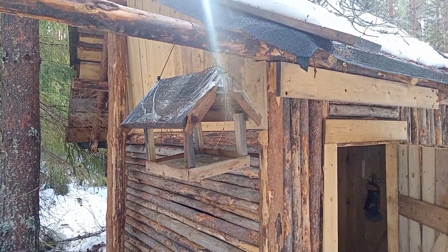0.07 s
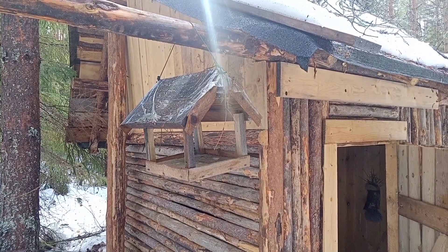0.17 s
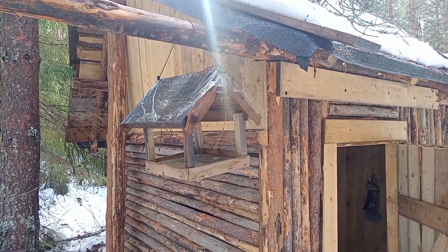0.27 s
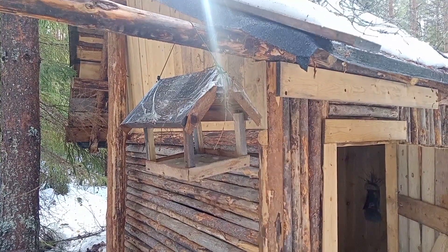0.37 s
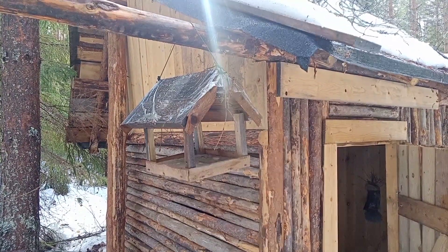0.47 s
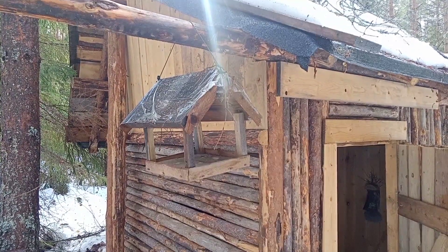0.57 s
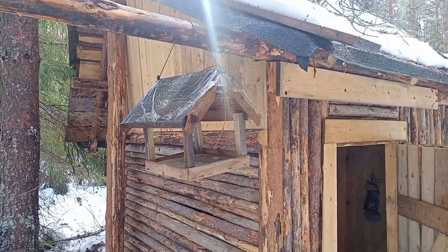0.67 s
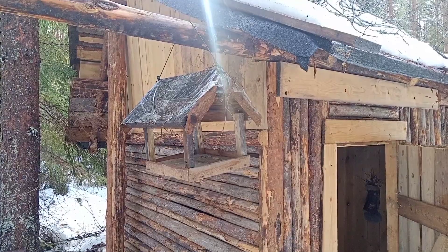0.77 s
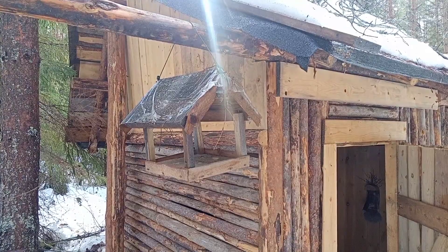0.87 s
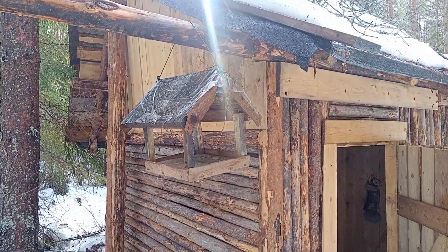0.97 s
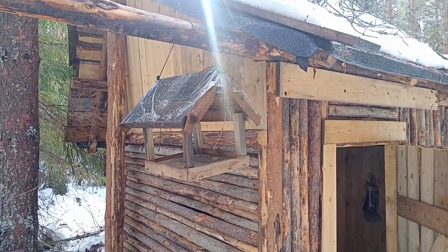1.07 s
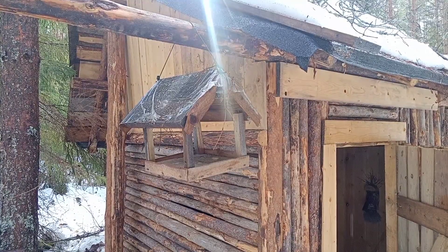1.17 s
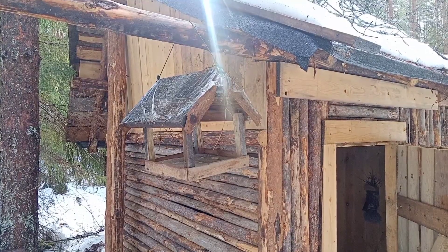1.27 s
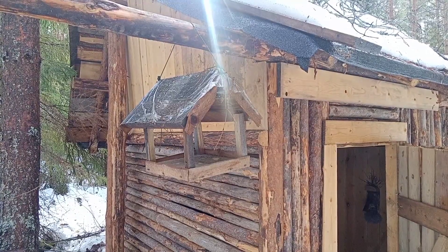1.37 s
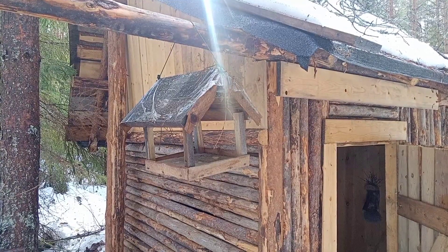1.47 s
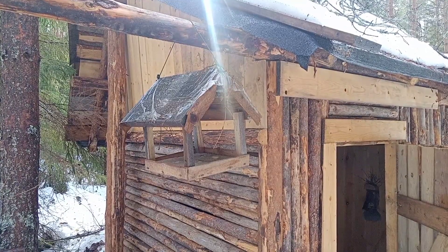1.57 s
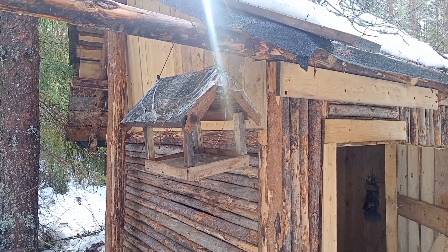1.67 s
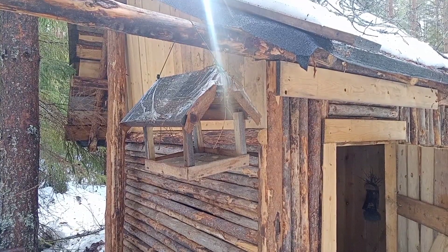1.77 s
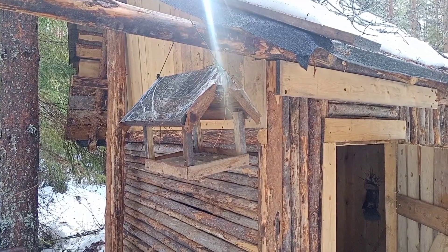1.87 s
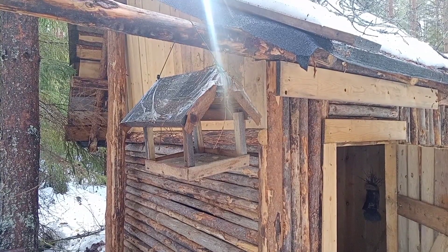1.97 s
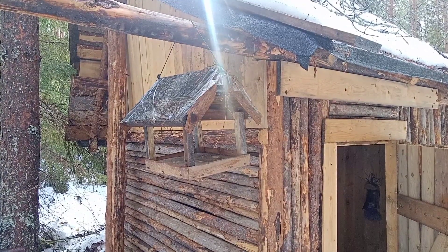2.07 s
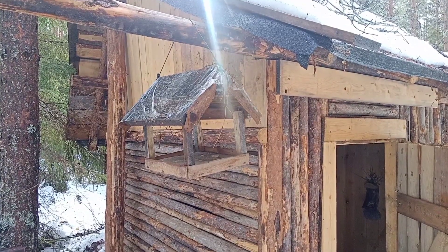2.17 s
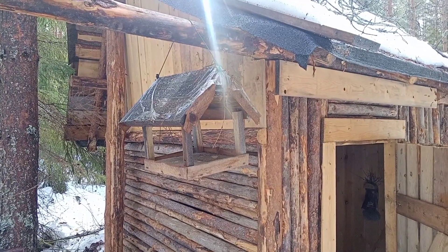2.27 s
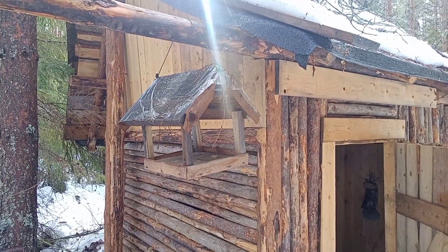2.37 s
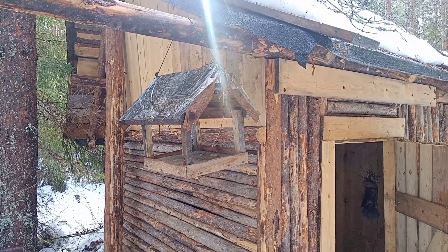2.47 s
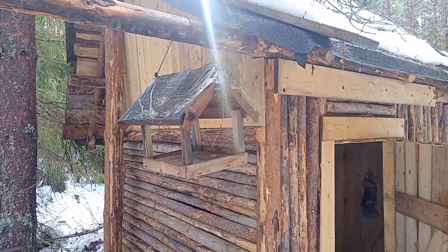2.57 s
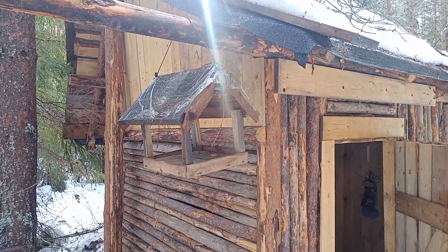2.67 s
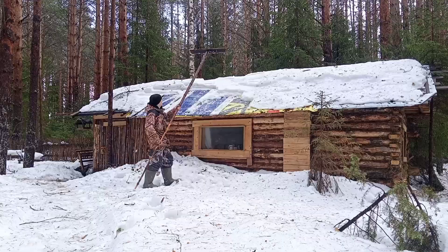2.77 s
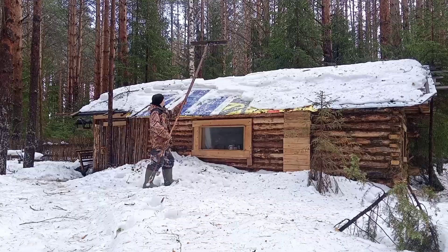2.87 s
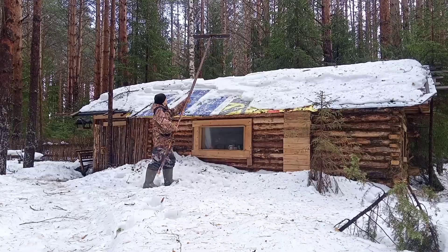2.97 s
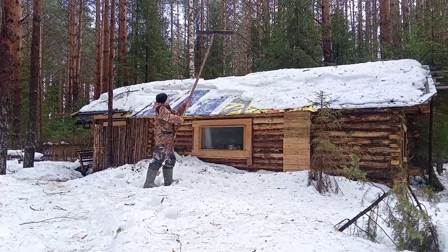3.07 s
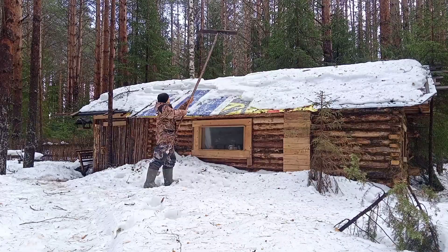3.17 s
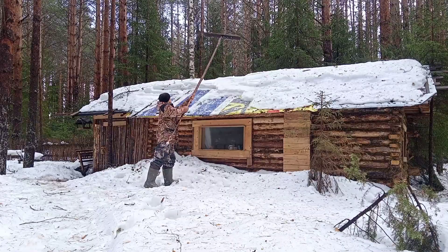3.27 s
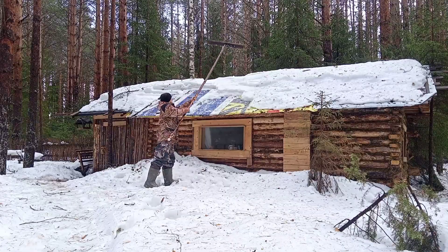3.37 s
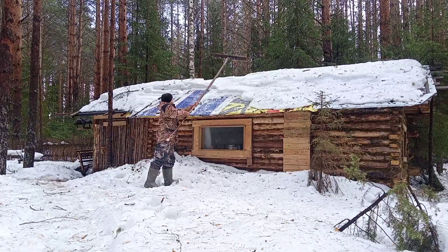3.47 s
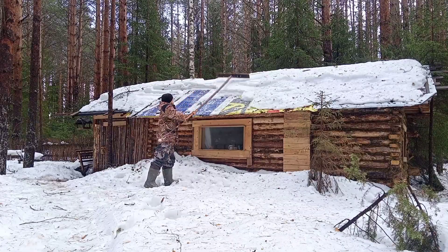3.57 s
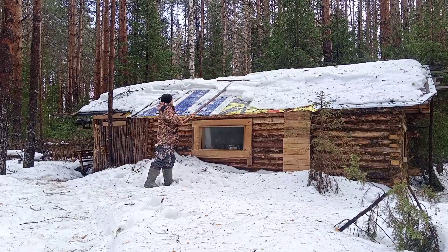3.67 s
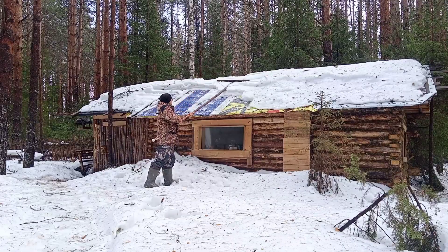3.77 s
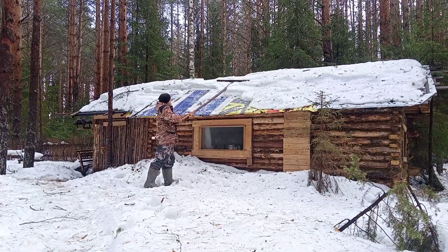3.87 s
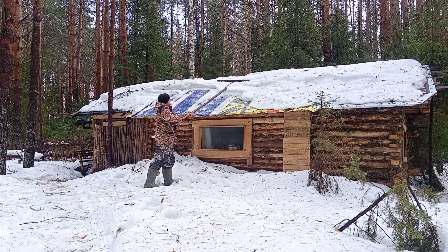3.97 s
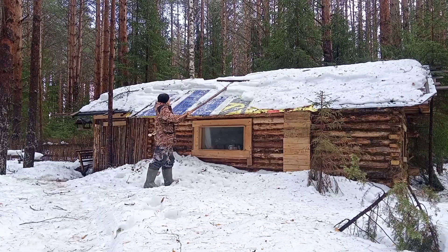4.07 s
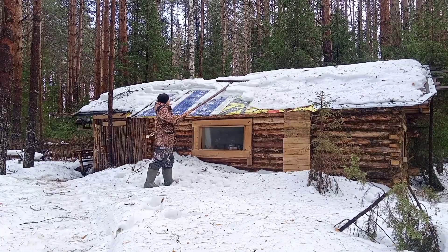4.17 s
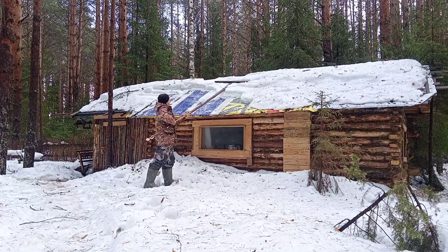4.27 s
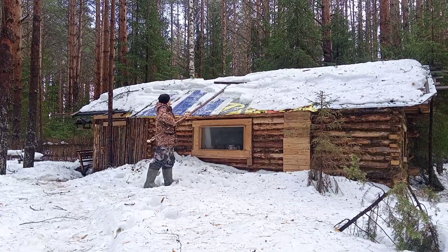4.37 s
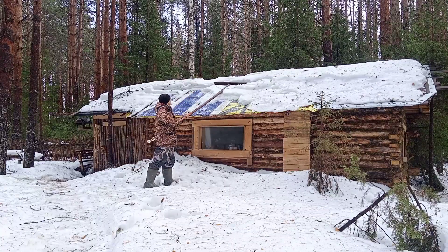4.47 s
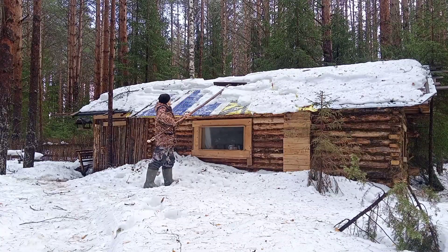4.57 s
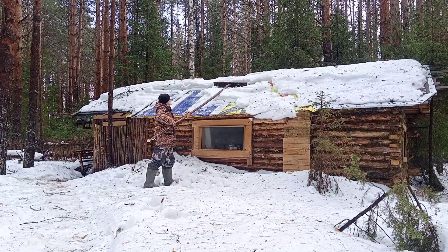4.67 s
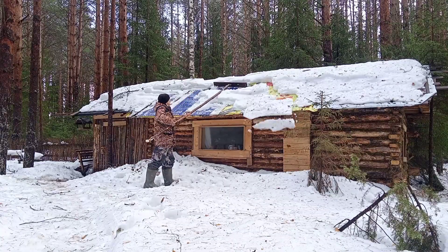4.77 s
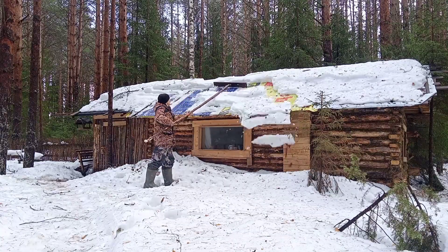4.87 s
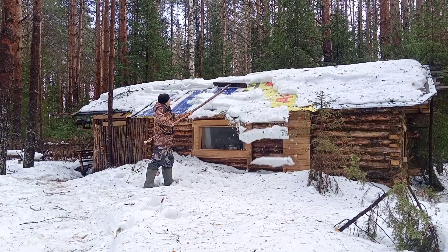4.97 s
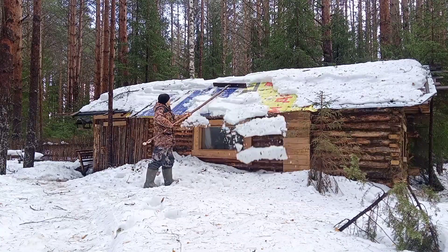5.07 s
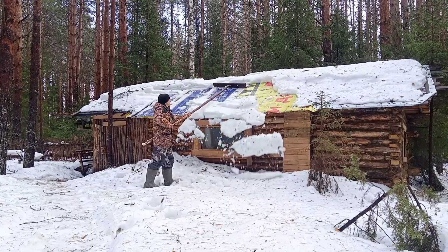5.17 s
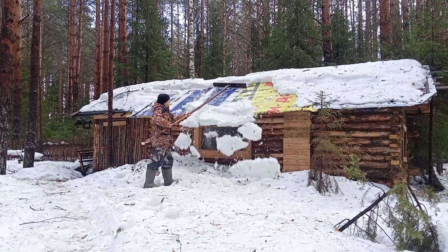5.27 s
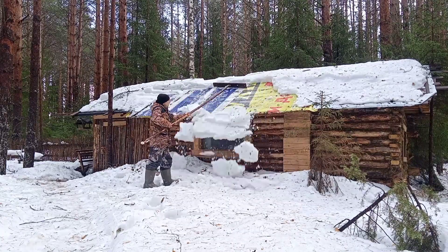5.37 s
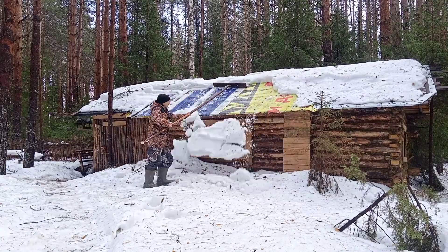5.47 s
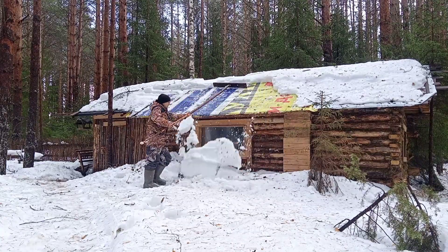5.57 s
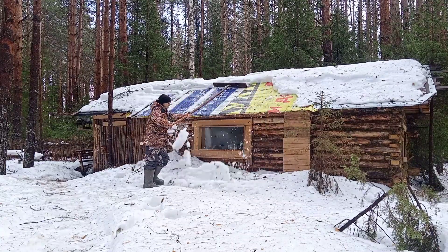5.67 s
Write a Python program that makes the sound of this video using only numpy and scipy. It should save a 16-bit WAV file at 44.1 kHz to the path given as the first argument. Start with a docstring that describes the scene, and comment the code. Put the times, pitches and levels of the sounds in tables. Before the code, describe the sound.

After faint drips and ticks of thaw, a rake chops into roof snow, which hisses down a tarp and lands in soft thuds.

```python
"""A still winter forest: thaw patters, ticks and drips faintly beside a log hut. After a moment of
silence we are at the hut's front, where a boot crunches the snow, crystal by snapping crystal.
A long wooden rake chops through the crust into the wet snow on the tarp roof, knocks the boards and
creeps on. The load comes loose, judders and hisses down the tarp, then falls in a spray of crystals
and in slabs that thud on the ground."""
import sys
import numpy as np
from scipy import signal
from scipy.fft import rfft, irfft
from scipy.io import wavfile
from scipy.ndimage import uniform_filter1d

SR = 44100
rng = np.random.default_rng(int(sys.argv[2]) if len(sys.argv) > 2 else 0)


def waveform_to_disk(signal):
    """Save audio, clipped to [-1, 1], as 16-bit WAV at the path in sys.argv[1]."""
    frames = np.transpose(np.atleast_2d(signal))
    scaled = np.clip(frames, -1, 1) * 32767
    samples = np.round(scaled).astype(np.int16)
    wavfile.write(sys.argv[1], SR, samples)


N = 252252
TIME = np.arange(N) / SR


def gain_of(db):
    """Decibels to amplitude."""
    return 10 ** (np.asarray(db) / 20)


def unit_rms(x):
    """Scales to rms 1."""
    return x / np.sqrt(np.mean(x ** 2) + 1e-20)


def curve_at(points, hz):
    """Reads a curve on a log-frequency axis."""
    point_hz, value = np.transpose(points)
    return np.interp(np.log(hz + 1), np.log(point_hz + 1), value)


def add(mix, start_s, sound):
    """Lays a sound into the mix."""
    part = mix[round(start_s * SR):][:len(sound)]
    part += sound[:len(part)]


def coloured(x, spectrum):
    """EQs a steady signal and returns it at rms 1."""
    eq = gain_of(curve_at(spectrum, np.fft.rfftfreq(N, 1 / SR)))
    return unit_rms(irfft(rfft(x) * eq, N))


def wander(step_s):
    """A control signal that glides to a new random value every step."""
    return np.interp(TIME / step_s, np.arange(N), rng.standard_normal(N))


def patchy(x, depth_db, span_s, span_hz):
    """Lets patches of the spectrum swell and sink at random."""
    spectra = signal.stft(x, nperseg=512, noverlap=384)[2]
    bins = max(1, round(span_hz * 512 / SR))
    frames = max(1, round(span_s * SR / 128))
    patches = uniform_filter1d(rng.standard_normal(spectra.shape), bins, axis=0)
    patches = unit_rms(uniform_filter1d(patches, frames, axis=1))
    uneven = signal.istft(spectra * gain_of(depth_db * patches), nperseg=512, noverlap=384)[1]
    return unit_rms(uneven[:N])


def grains(spectrum, per_s, spread_db, clump_db, clump_s):
    """Snow crystals snap at random, in many sizes and in clumps."""
    size = gain_of(spread_db * np.minimum(rng.exponential(1, N), 4)) * rng.choice([-1, 1], N)
    clicks = size * (rng.random(N) < per_s / SR)
    return coloured(clicks * gain_of(clump_db * wander(clump_s)), spectrum)


def snaps(rows, rise_cycles=0.52):
    """Brittle breaks: each a quickly dying noise burst in its own band."""
    out, t, hz = np.zeros(N), TIME[:4096], np.fft.rfftfreq(4096, 1 / SR)
    for s, db, centre_hz, octaves, t60 in rows:
        band = np.exp(-.5 * (np.log2((hz + 1) / centre_hz) / octaves) ** 2) / np.sqrt(hz + centre_hz)
        envelope = gain_of(-60 * t / t60) * (1 - np.exp(-t * centre_hz / rise_cycles))
        burst = irfft(rfft(rng.standard_normal(len(t))) * band) * envelope
        add(out, s, .5 * gain_of(db) * burst * np.linalg.norm(envelope) / np.linalg.norm(burst))
    return out


def stroke(start_s, db, length_s, attack_s, sag_db_per_s, t60):
    """Envelope of one push: a quick rounded attack, a sagging hold, a release."""
    t = np.maximum(TIME - start_s, 0)
    attack = np.sin(np.pi / 2 * np.minimum(t / attack_s, 1)) ** 2
    release_db = 60 * np.maximum(t - length_s, 0) / t60
    return attack * gain_of(db - sag_db_per_s * t - release_db)


def surge(peak_s, length_s, db):
    """Envelope of a smooth swell around its peak."""
    return gain_of(db) * np.cos(np.pi * np.clip((TIME - peak_s) / length_s, -.5, .5)) ** 2


def air(spectrum, db):
    """The forest's ambience bed: faint, slightly uneven noise."""
    bed = coloured(rng.standard_normal(N), spectrum)
    return gain_of(db) * patchy(bed, depth_db=1.5, span_s=0.12, span_hz=600)


# Tone of the air beside the hut. Each row: frequency in Hz, relative level in dB.
SIDE_AIR_EQ = [(15, -56), (25, -33), (35, -28), (53, -6.5), (193, -2.5), (281, -4.5), (313, -2.5),
               (509, -3.5), (895, -8.5), (2060, -13), (3340, -18.5), (6380, -39.5), (7700, -39),
               (12200, -45), (15500, -44)]

def side_air():
    """Still air murmurs beside the hut."""
    return air(SIDE_AIR_EQ, db=-66)


# Tone of thawing snow. Each row: frequency in Hz, relative level in dB.
PATTER_EQ = [(1500, -30), (3000, 3), (5500, -13), (7800, -1), (10000, -32), (12500, -12), (15500, -5.5)]

def patter(per_s=24, decay_s=0.0041, spread_db=7.0):
    """Tiny specks of thaw land at random, each a short, very faint fizz."""
    size = gain_of(spread_db * np.minimum(rng.exponential(1, N), 3))
    specks = size * (rng.random(N) < per_s / SR)
    envelope = signal.lfilter([1], [1, -np.exp(-1 / (decay_s * SR))], specks)
    return gain_of(-93) * coloured(envelope * rng.standard_normal(N), PATTER_EQ)


# Small dry ticks. Each row: start in seconds, snap centre in Hz, then snap, ring and fizz levels in dB.
TICKS = [(0.1297, 3070, -48.5, -76, -63), (0.3487, 5000, -72, -80, -77), (0.4145, 5000, -82, -69, -81),
         (0.6859, 6000, -76, -85, -75), (0.785, 6000, -76, -76, -77), (1.1489, 3000, -62, -79, -82),
         (1.5178, 6000, -65, -55, -72), (1.5298, 2200, -51.5, -64, -75), (2.5271, 2520, -41, -71, -75),
         (2.6011, 6000, -69, -67, -80)]
# Their ring. Each row: centre in Hz, trim on the ring level in dB, width in octaves, t60 in seconds.
TICK_RING = [(7420, -1, 0.1, 0.031), (15000, -1, 0.12, 0.018)]

def ticks(snap_octaves=0.98, snap_t60=0.0093, fizz_hz=8500, fizz_octaves=0.7, fizz_t60=0.05):
    """Each close tick is a dry snap with a thin ring and a short fizz."""
    snap = snaps([(s, db, hz, snap_octaves, snap_t60) for s, hz, db, _, _ in TICKS])
    ring = snaps([(s, db + trim_db, hz, octaves, t60)
                  for s, _, _, db, _ in TICKS for hz, trim_db, octaves, t60 in TICK_RING])
    fizz = snaps([(s, db, fizz_hz, fizz_octaves, fizz_t60) for s, _, _, _, db in TICKS])
    return snap + ring + fizz


# Drips of melt water. Each row: start in seconds, level in dB, pitch in Hz.
DRIPS = [(0.3836, -36.5, 845), (0.736, -54, 1540), (0.7765, -55, 2460), (0.8491, -54, 1630),
         (1.335, -56, 1600), (1.9032, -55, 1520), (1.941, -52, 2250), (2.2542, -55, 1480)]

def drips(rise_s=0.0012, t60_cycles=50, twin_ratio=0.932, twin_db=-7,
          splat_db=-7, splat_octaves=0.71, splat_t60=0.024):
    """Each drop lands with a wet splat and rings a close pair of damped notes that beat."""
    notes, t = np.zeros(N), TIME[:SR // 5]
    for s, db, hz in DRIPS:
        envelope = gain_of(db - 60 * t * hz / t60_cycles) * (1 - np.exp(-t / rise_s))
        pair = np.sin(2 * np.pi * hz * t) + gain_of(twin_db) * np.sin(2 * np.pi * hz * twin_ratio * t)
        add(notes, s, envelope * pair)
    return notes + snaps([(s, db + splat_db, hz, splat_octaves, splat_t60) for s, db, hz in DRIPS])


# Reverb among the trunks. Each row: frequency in Hz, t60 in seconds.
FOREST_DECAY = [(100, 0.24), (350, 0.29), (800, 0.67), (2500, 0.55), (6000, 0.55), (15000, 0.44)]

def forest_echo(x, echoes_per_s=2000, predelay_s=0.02):
    """Sparse echoes come back from the trunks; the mids hang on longest."""
    taps = rng.choice([-1., 1.], SR) * (rng.random(SR) < echoes_per_s / SR) * (TIME[:SR] > predelay_s)
    hz, t, spectra = signal.stft(taps, SR, nperseg=256)
    decay = gain_of(-60 * t / curve_at(FOREST_DECAY, hz)[:, None])
    tail = signal.istft(spectra * decay, SR, nperseg=256)[1]
    return signal.fftconvolve(x, tail / np.linalg.norm(tail))[:N]


# Tone of the air in front of the hut. Each row: frequency in Hz, relative level in dB.
FRONT_AIR_EQ = [(20, -67), (56, -15.5), (140, -3.5), (185, -10), (245, -17), (400, -20), (650, -21),
                (1500, -21), (2600, -29), (4000, -37.5), (5800, -48.5), (7900, -47), (11000, -57.5),
                (15500, -53)]

def front_air(split_hz=230, low_boost_db=1, waver_db=1):
    """Open air before the hut; its low murmur wavers a little at random."""
    bed = air(FRONT_AIR_EQ, db=-59.5)
    low = signal.filtfilt(*signal.butter(2, split_hz, fs=SR), bed)
    return bed - low + low * gain_of(low_boost_db + waver_db * wander(step_s=0.032))


# Tone of trodden snow. Each row: frequency in Hz, relative level in dB.
CRUNCH_EQ = [(35, -43), (60, -20), (112, -46), (272, -3.5), (433, -12), (497, -12), (533, -9.5),
             (1320, -8.5), (3190, -14.5), (5200, -27), (8090, -25), (9970, -36), (15500, -29)]
# Heel, then sole. Each row: start in seconds, level in dB, hold in seconds.
BOOT_PRESSES = [(2.765, -51.5, 0.135), (2.948, -65, 0.033)]

def boot_crunch():
    """Snow crunches under a boot, less and less as it packs."""
    press = sum(stroke(s, db, hold_s, attack_s=0.0021, sag_db_per_s=42, t60=0.62)
                for s, db, hold_s in BOOT_PRESSES)
    return press * grains(CRUNCH_EQ, per_s=6000, spread_db=2.5, clump_db=1.5, clump_s=.006)


# Dull thuds: a footfall, the rake on the roof, then slabs on the ground.
# Each row: start in seconds, level in dB, pitch in Hz.
THUDS = [(3.495, -50, 135), (3.887, -34, 157), (3.8927, -26, 157), (5.125, -38.5, 84.5), (5.493, -41.5, 81),
         (5.577, -42, 86), (5.619, -40, 110), (5.699, -35, 106.4)]

def thuds(rows, swell_cycles=0.44):
    """Soft heavy blows swell and die within a few cycles."""
    out, t = np.zeros(N), TIME[:SR // 5]
    for s, db, hz in rows:
        age = t * hz / swell_cycles
        add(out, s, gain_of(db) * age * np.exp(1 - age) * np.sin(2 * np.pi * hz * t))
    return out


# Tone of snow crushed by the rake head. Each row: frequency in Hz, relative level in dB.
CHOP_EQ = [(29, -49), (50, -7), (110, -8.5), (350, -3), (500, -4), (700, -8), (1100, -10), (2000, -10.5),
           (3300, -15.5), (5660, -30), (7730, -26), (10600, -37), (15500, -32)]

def rake_chop(muffle_hz=4200, break_s=3.7164, sink_s=0.035, bright_db=3):
    """The head lands, crushes the snow and sounds duller as it sinks through the broken crust."""
    push = stroke(start_s=3.703, db=-27.5, length_s=0.048, attack_s=0.019, sag_db_per_s=35, t60=0.084)
    crush = push * grains(CHOP_EQ, per_s=11000, spread_db=3.0, clump_db=-1.5, clump_s=.003)
    body = signal.lfilter(*signal.butter(2, muffle_hz, fs=SR), crush)
    fizz = signal.lfilter(*signal.butter(2, muffle_hz, "high", fs=SR), -crush)
    exposed = np.exp(-np.maximum(TIME - break_s, 0) / sink_s)
    return body + gain_of(bright_db) * exposed * fizz


# Cracks in the crust. Each row: start in seconds, level in dB, centre in Hz, t60 in seconds.
CRACKS = [(3.7164, -13, 2780, 0.014), (3.7283, -18, 900, 0.013), (3.7349, -15.5, 2290, 0.014),
          (3.7501, -20, 1100, 0.0051), (3.887, -35, 1980, 0.064), (4.4622, -26, 906, 0.018),
          (4.958, -21.5, 2220, 0.03), (5.2655, -24, 3470, 0.016)]

def crust_cracks(octaves=0.5):
    """The brittle crust snaps under the rake, and later under the sliding load."""
    return snaps([(s, db, hz, octaves, t60) for s, db, hz, t60 in CRACKS])


# Tone of snow under the creeping rake. Each row: frequency in Hz, relative level in dB.
CREEP_EQ = [(59, -56), (100, -11), (209, 1.5), (386, -20), (497, -12.5), (977, -15.5), (1430, -12),
            (1800, -14), (3460, -16), (6120, -28), (8060, -24), (10800, -39.5), (15500, -30)]
# The rake settles with a dying crunch. Each row: start in seconds, level in dB, t60 in seconds.
SETTLES = [(3.785, -50.5, 0.31), (3.871, -52.5, 0.43), (3.955, -59, 0.12)]
SLIDE_S = 4.172  # the snow gives way

def rake_creep(start_s=3.9, attack_s=0.013, sag_db_per_s=3):
    """The head settles three times and creeps through the snow until the slide starts."""
    settling = sum(stroke(s, db, attack_s, attack_s, sag_db_per_s, t60) for s, db, t60 in SETTLES)
    pulling = stroke(start_s, -56, SLIDE_S - start_s, attack_s, sag_db_per_s, t60=0.56)
    crunch = grains(CREEP_EQ, per_s=7000, spread_db=2.5, clump_db=2.0, clump_s=0.0064)
    return np.hypot(settling, pulling) * crunch


# Resonances of the roof boards. Each row: pitch in Hz, level in dB, t60 in seconds.
BOARD_MODES = [(346, -34, 0.065), (476, -30, 0.024), (732, -33.5, 0.031)]

def board_knock(start_s=3.892, rise_s=0.0014):
    """The roof boards ring briefly under a knock of the rake that the snow cushions."""
    t = np.maximum(TIME - start_s, 0)
    ring = sum(gain_of(db - 60 * t / t60) * np.sin(2 * np.pi * hz * t) for hz, db, t60 in BOARD_MODES)
    return ring * (1 - np.exp(-t / rise_s))


# The slide's three layers: the mass dragging, the tarp hissing, loose crystals spraying.
# Each row: frequency in Hz, relative level in dB.
DRAG_EQ = [(21, -50), (35, -34), (75, -13), (135, -10.5), (250, -3.5), (346, -2.5), (420, -10), (487, -2),
           (563, -7.5), (621, 0), (707, -6), (767, -3), (1080, -8.5), (1700, -13.5), (2210, -13.5),
           (3740, -120)]
HISS_EQ = [(650, -18), (1100, -8), (1370, -4), (1580, -5.5), (2870, 0.5), (3590, -4.5), (5240, -14),
           (6500, -18.5), (8450, -23), (14300, -120)]
SPRAY_EQ = [(2240, -9), (3800, -2), (5770, -9.5), (6450, -6.5), (7970, -1.5), (9570, -12.5), (12300, -15.5),
            (14900, -12.5), (15500, -4.5)]
# The mass jerks forward and bumps the roof. Each row: time in seconds, level in dB.
JOLTS = [(4.275, -37.5), (4.411, -33.5), (4.463, -29), (4.571, -35.5), (4.68, -31.5), (4.9, -28.5)]
# Slabs break off and burst.
# Each row: peak time in seconds, length in seconds, then drag, hiss and spray levels in dB.
SLABS = [(4.488, 0.19, -53, -41, -55), (4.81, 0.3, -43.5, -38, -50), (5.276, 0.12, -50, -41.5, -35),
         (5.426, 0.15, -76, -45.5, -35.5), (5.519, 0.094, -69.5, -42, -33.5), (5.59, 0.13, -59, -45, -37.5),
         (5.712, 0.19, -49, -39, -36.5)]

def snow_slide(gather_s=0.39, eaves_s=4.944, empty_db_per_s=21,
               roof_hz=267, jolt_length_s=0.071, jolt_drag_db=-11):
    """The mass judders over the roof, its underside hisses on the tarp, and crystals shower down."""
    drag = grains(DRAG_EQ, per_s=3000, spread_db=2.0, clump_db=1.0, clump_s=.012)
    drag = patchy(drag, depth_db=2.3, span_s=0.078, span_hz=170)
    hiss = grains(HISS_EQ, per_s=14000, spread_db=1.5, clump_db=0.34, clump_s=0.014)
    hiss = patchy(hiss, depth_db=1.5, span_s=0.021, span_hz=500)
    spray = grains(SPRAY_EQ, per_s=18000, spread_db=1.5, clump_db=-0.4, clump_s=.008)
    spray = patchy(spray, depth_db=2.0, span_s=0.032, span_hz=700)
    # The flow builds, then thins out once the snow tips over the eaves.
    age = np.maximum(TIME - SLIDE_S, 0)
    flow = (1 - np.exp(-age / gather_s)) * gain_of(-empty_db_per_s * np.maximum(TIME - eaves_s, 0))
    jerks = sum(surge(s, jolt_length_s, db + jolt_drag_db) for s, db in JOLTS)
    slab_drag, slab_hiss, slab_spray = sum(surge(s, length_s, np.array(dbs)[:, None])
                                           for s, length_s, *dbs in SLABS)
    # As the mass crumbles, the balance tilts from drag to spray.
    drag *= np.hypot(flow * gain_of(-33 - 6 * age), jerks + slab_drag)
    hiss *= np.hypot(flow * gain_of(-34 + 2 * age), slab_hiss)
    spray *= np.hypot(flow * gain_of(-44 + 8 * age), slab_spray)
    bumps = thuds([(s, db, roof_hz) for s, db in JOLTS])
    return drag + hiss + spray + bumps


def scene(side_ends_s=2.692, front_starts_s=2.755):
    """The side of the hut, a short silence, then the work at the front; both channels alike."""
    drops = drips()
    drop_echo = gain_of(-24) * forest_echo(drops)
    side = side_air() + drops + drop_echo + ticks() + patter()
    work = rake_chop() + crust_cracks() + rake_creep() + board_knock()
    front = front_air() + boot_crunch() + thuds(THUDS) + work
    front += gain_of(-16.5) * forest_echo(work) + snow_slide()
    mono = side * (TIME < side_ends_s) + front * (TIME > front_starts_s)
    return np.array([mono, mono])


def record(dry, low_cut_hz=36, high_cut_hz=15570):
    """The microphone drops the deepest bass; a steep high cut trims the top."""
    low_cut = signal.butter(2, low_cut_hz, "high", fs=SR, output="sos")
    high_cut = signal.firwin(1023, high_cut_hz, window=("kaiser", 8), fs=SR)
    thinned = signal.sosfiltfilt(low_cut, dry, padtype="even")
    return signal.oaconvolve(thinned, high_cut[None], "same")


dry = scene()
out = record(dry)
waveform_to_disk(out)
```